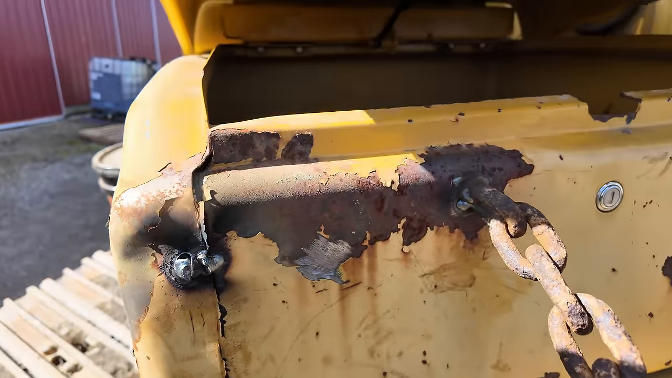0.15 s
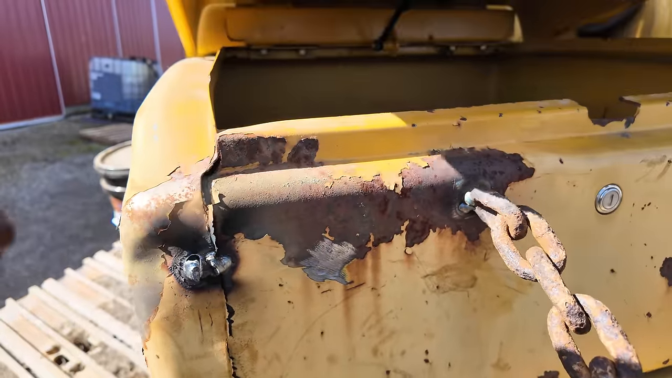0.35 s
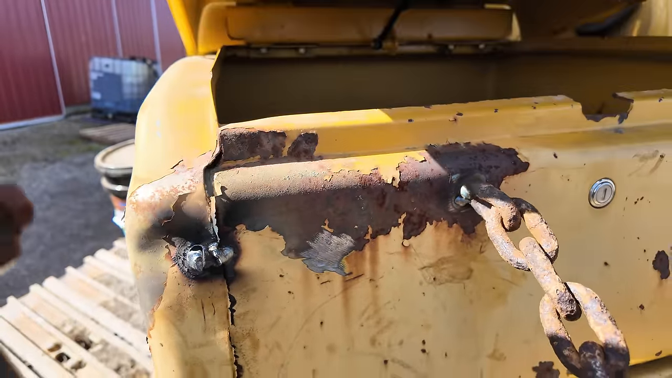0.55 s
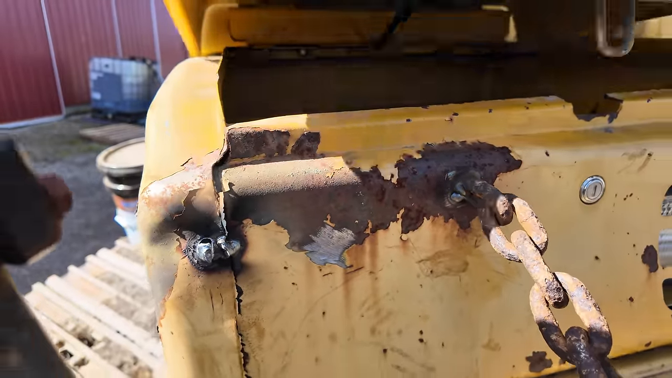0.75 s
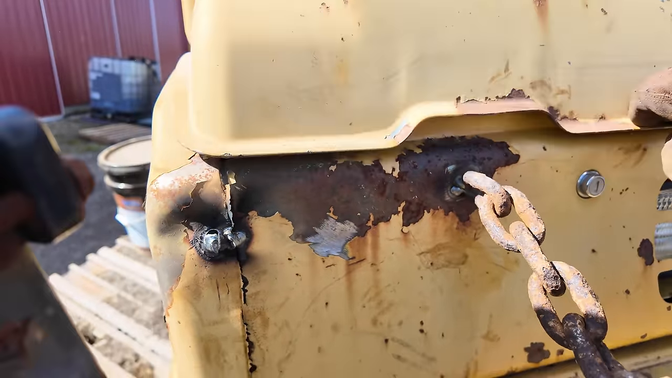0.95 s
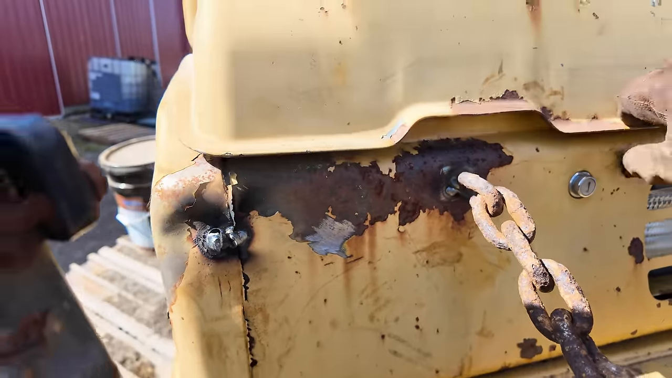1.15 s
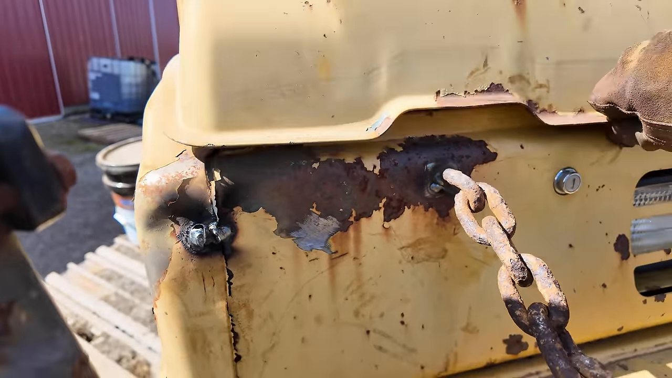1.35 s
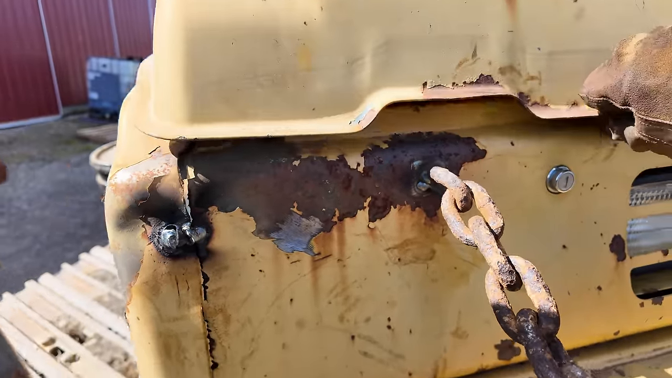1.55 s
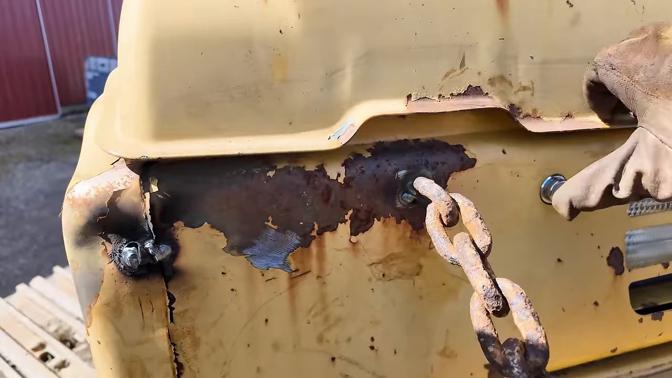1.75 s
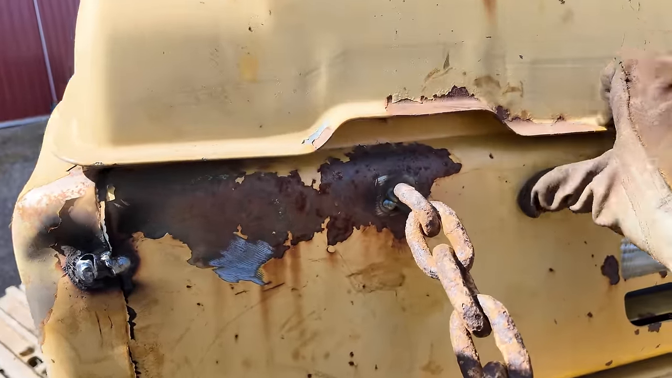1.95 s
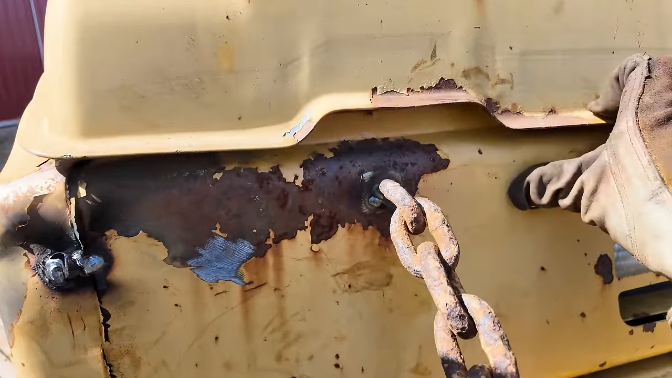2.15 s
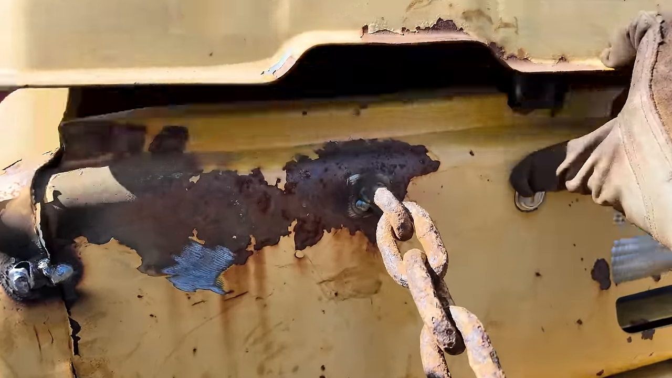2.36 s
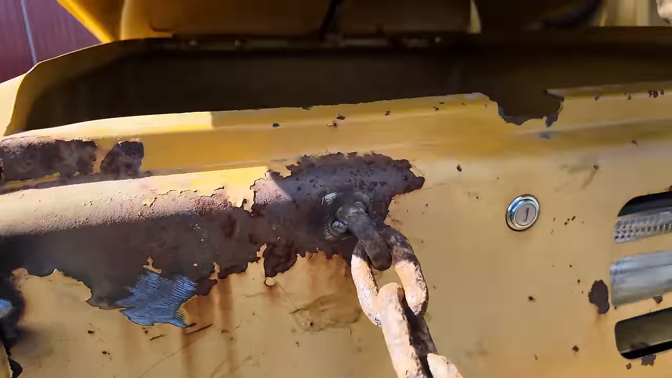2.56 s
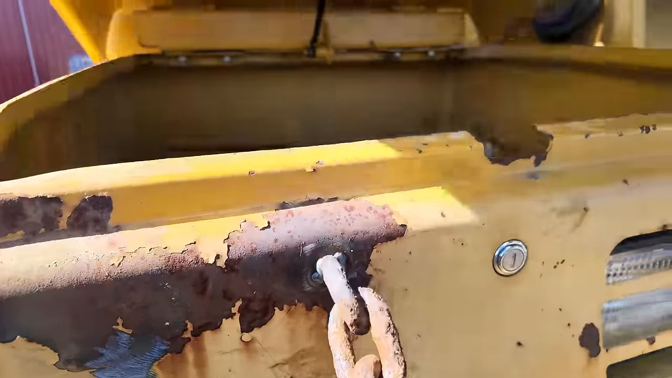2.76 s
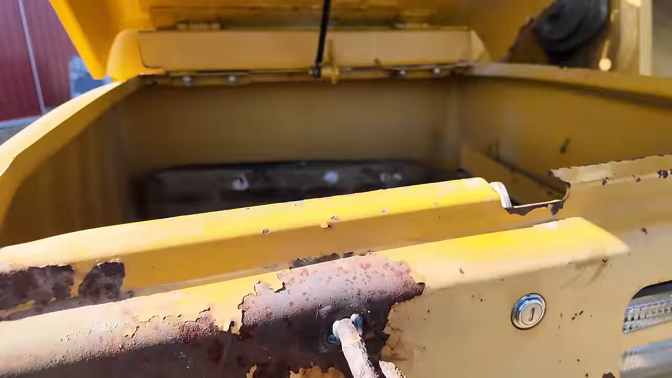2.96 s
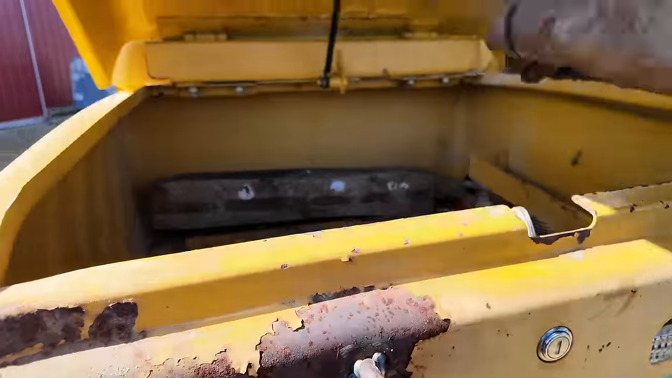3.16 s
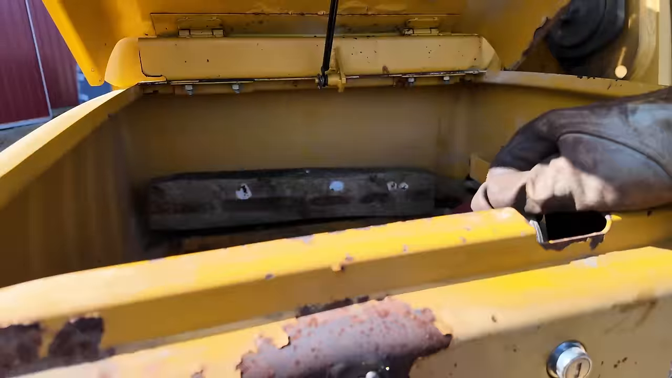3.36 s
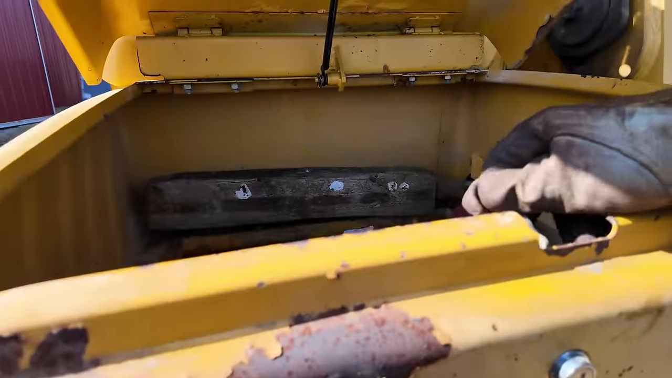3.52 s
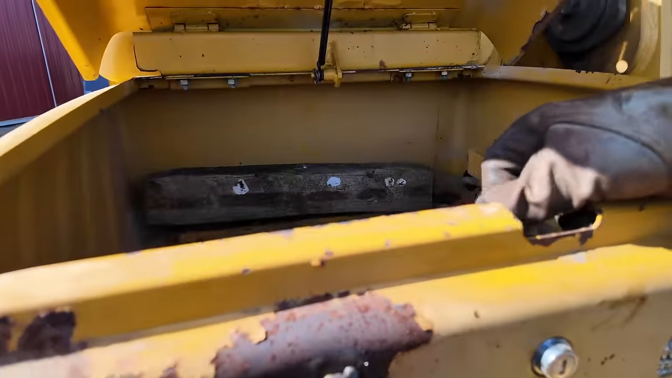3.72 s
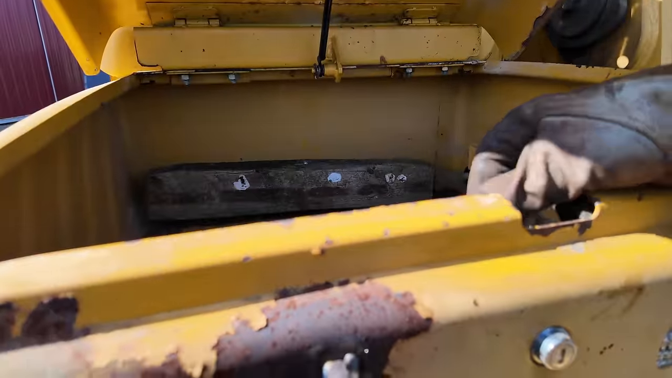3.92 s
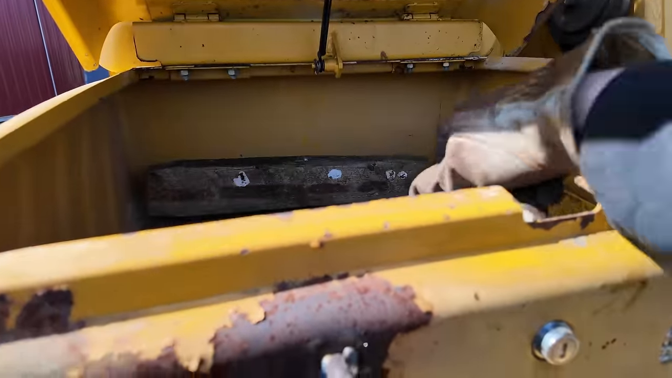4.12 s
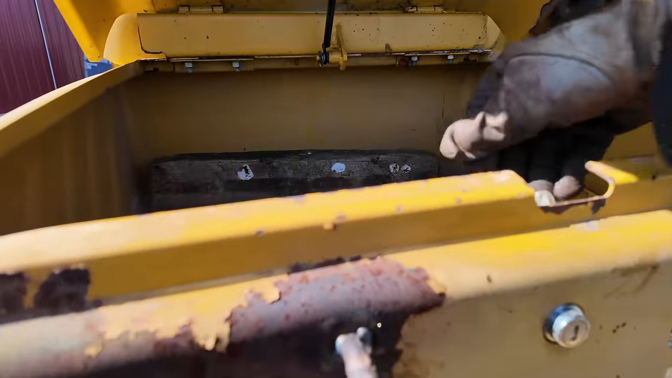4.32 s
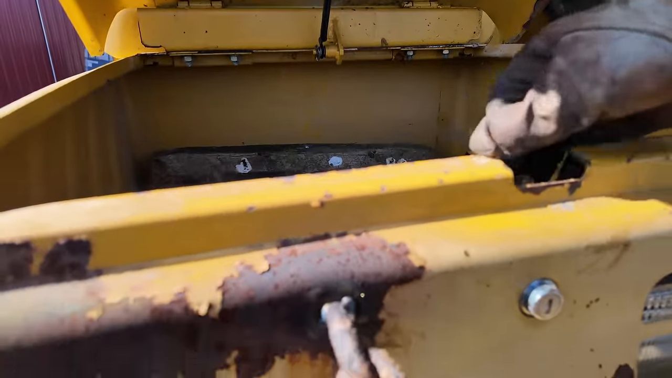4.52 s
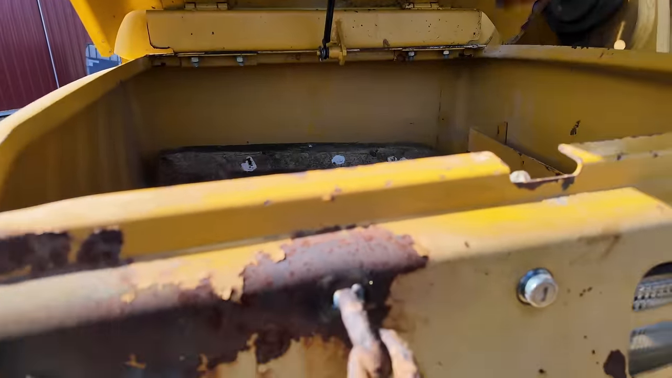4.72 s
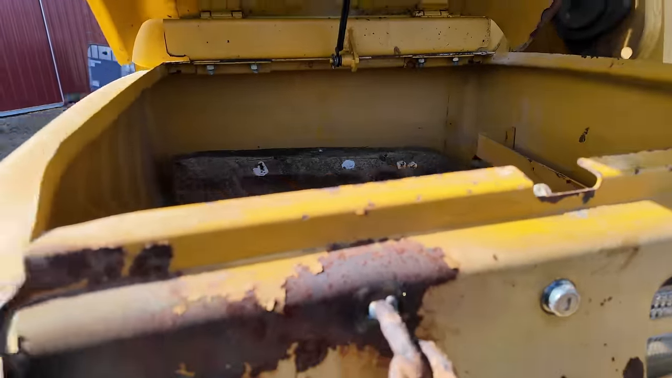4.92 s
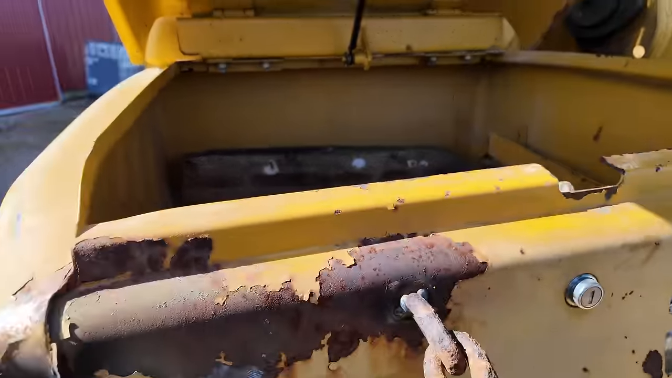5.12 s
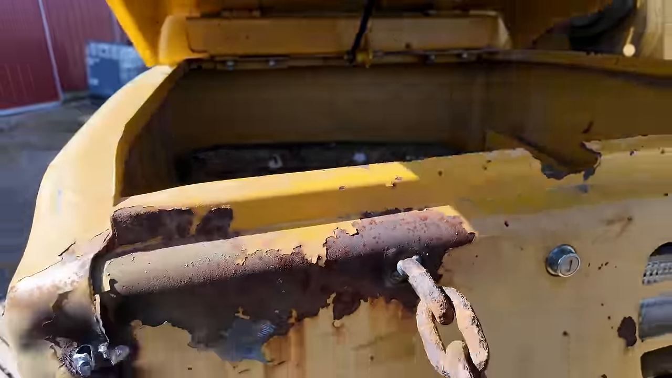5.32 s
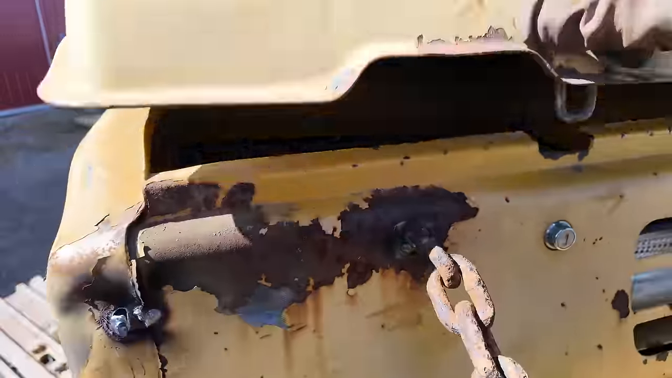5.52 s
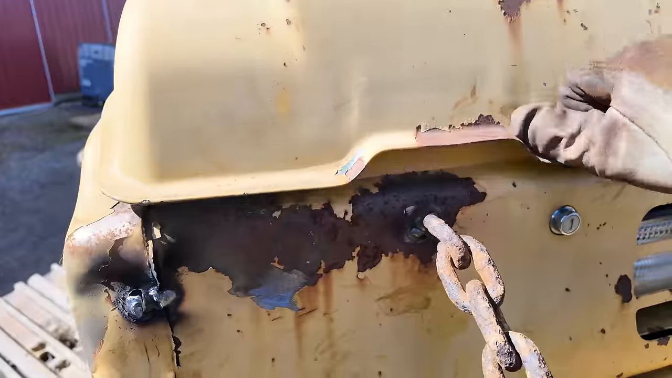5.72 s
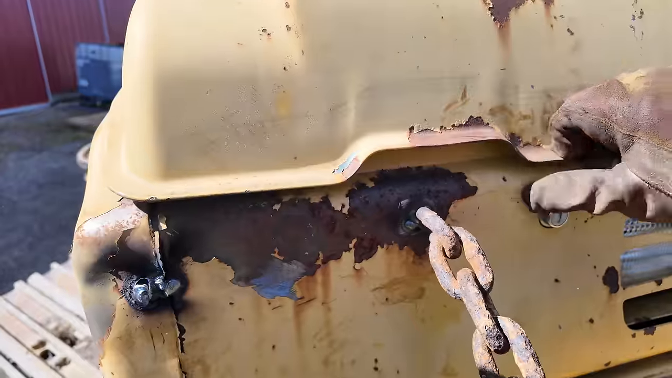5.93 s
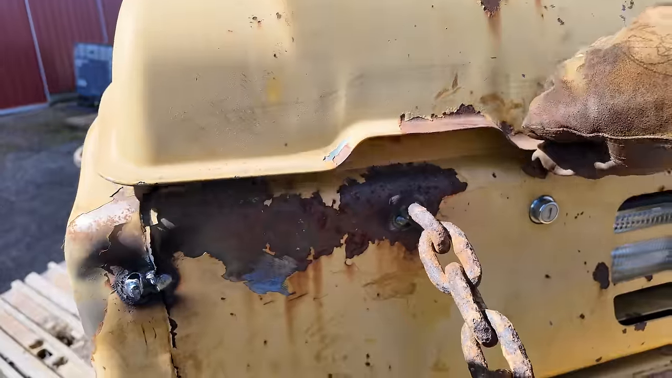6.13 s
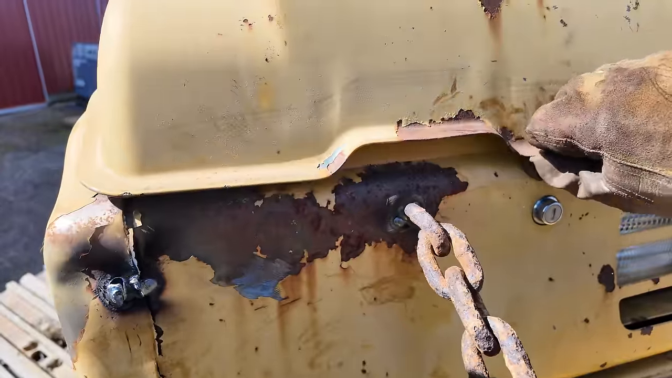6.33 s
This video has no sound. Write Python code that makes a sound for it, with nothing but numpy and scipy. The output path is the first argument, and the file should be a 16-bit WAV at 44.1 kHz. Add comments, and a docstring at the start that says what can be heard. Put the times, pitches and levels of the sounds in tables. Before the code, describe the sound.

A diesel engine idles across an open yard throughout, a low, steady drone well below the close sounds. At about 1 second the steel hood of an excavator slams with a sharp crack and a deep boom, rocks on its seat and sets a loose shackle squeaking faintly. A smaller clack follows at 1.5 seconds and a soft bump near 2 seconds. From about 2.2 to 3.3 seconds there are dull hand pushes, faint glove rubs and the quiet hiss of a strut as the hood lifts. A gloved hand knocks on the steel rim at about 3.5 and 4.4 seconds, short and hollow, with fainter taps and ticks around them. At 5.7 seconds the hood slams loudly again, with a bright latch click, bouncing and rattling as the panel booms. A lighter clack of the catch comes at about 6.2 seconds.

```python
"""A diesel engine idles across the yard throughout. At 1 s the steel hood of an excavator is slammed:
it booms, rocks on its seat and sets a loose shackle squeaking. It is lifted on its hissing strut.
From 3.3 to 4.4 s a gloved hand knocks twice on the steel rim of the open compartment, among
fainter taps. At 5.7 s the hood is slammed again; it bounces and rattles on its catch."""
import sys
import numpy as np
from scipy import signal
from scipy.fft import rfft, irfft, next_fast_len
from scipy.io import wavfile
from scipy.ndimage import uniform_filter1d, minimum_filter1d

SR = 44100
rng = np.random.default_rng(int(sys.argv[2]) if len(sys.argv) > 2 else 0)


def pcm_store(signal):
    """Save signal as 16-bit PCM."""
    levels = np.round(np.clip(np.atleast_2d(signal), -1, 1) * 32767)
    wavfile.write(sys.argv[1], SR, levels.astype(np.int16).T)


N = 281358

# exhaust lines: firing_multiple, level_db
EXHAUST_LINES = [(2, -61), (4, -52.5), (5, -55.5), (6, -49), (7, -41.5), (8, -47), (10, -57), (14, -52.5),
                 (15, -59.5), (16, -51), (17, -58), (18, -56), (20, -58), (21, -72.5), (23, -55)]
# unequal knock of the six cylinders: level_db
CYLINDER_LEVELS_DB = [0.59, -1, 1.9, -1.2, 0.61, 2.4]
# engine drone, combustion knock, tappets, fan: freq_hz, level_db
DRONE_SPECTRUM = [(15, -62), (30, -47.5), (70, -11.5), (110, -14.5), (150, -2.5), (180, -5), (240, 1),
                  (275, -6), (305, -8), (500, -27.5), (1000, -72.5)]
COMBUSTION_SPECTRUM = [(200, -16.5), (340, -3.5), (430, 0), (600, 0.5), (720, -4.5), (900, -6.5),
                       (1120, -14.5), (1400, -17), (1750, -28), (4000, -59), (16000, -80)]
TAPPET_SPECTRUM = [(600, -22), (900, -2.5), (1120, -3.5), (1320, 3), (1480, -13.5), (1800, -23.5),
                   (4000, -53.5)]
FAN_SPECTRUM = [(800, 0), (1900, -7.5), (2550, -1), (4000, -13), (7000, -22), (9500, -31.5), (16000, -43)]

# sleeve and glove rubs, strut hiss: peak_s, level_db, rise_s, fall_s
RUB_SWELLS = [(1.76, -75, .06, 0.045), (2.24, -66, .04, .05), (2.36, -66, 0.043, 0.048),
              (2.97, -60.5, 0.34, 0.17), (3.32, -66.5, 0.11, 0.32), (4.99, -62, .025, 0.18)]
# their noise: freq_hz, level_db
RUB_SPECTRUM = [(1200, -8), (2400, 11), (3200, 7.5), (4400, -2), (6500, -5), (10000, -12), (12500, -18),
                (16000, -34)]
# hand pushes on the steel: start_s, level_db, length_s, pitch_hz
HAND_PUSHES = [(.76, -43.5, 0.18, 120), (2.24, -38, 0.11, 100), (2.38, -40, 0.16, 138),
               (3.199, -33, 0.18, 222), (4.79, -43, 0.089, 244), (5.323, -39.5, 0.051, 230)]
# their rumble: pitch_ratio, level_db
PUSH_SPECTRUM = [(.25, -22.5), (.7, -7.5), (1, -1.5), (1.3, -2), (2.5, -40), (8, -75)]

# ring of a small steel part: pitch_ratio, level_db
STEEL_PARTIALS = [(1, 1.5), (1.21, -9.5), (1.4, -21)]
# latch ticks: start_s, level_db, pitch_hz, scrape_relative_db
LATCH_TICKS = [(1.0798, -44, 6880, -15), (2.135, -72, 8450, -6), (3.5475, -69, 7960, 3),
               (4.058, -66.5, 6900, -2), (5.7222, -23, 7300, -12.5), (5.801, -42, 7400, -13.5),
               (6.2337, -54, 6260, 8)]
# nudges of the loose catch: start_s, level_db
CATCH_CLACKS = [(1.4984, -36.5), (3.8789, -36.5), (6.1879, -33.5)]
# steel scrape, catch body: freq_hz, level_db
SCRAPE_SPECTRUM = [(500, -52.5), (2500, -22), (5500, 8.5), (8000, -2), (10000, -6), (15000, -19.5)]
CLACK_SPECTRUM = [(1100, -29), (1750, -2), (2150, 1.5), (2900, -8.5), (4000, -16.5), (7000, -46)]

# clear panel modes: freq_hz, level_db, t60_s
RIM_CLEAR_MODES = [(152.6, -29, 0.45), (208, -23, 0.5), (245, -15.5, 0.065), (314, -11.5, 0.19),
                   (412, -20, 0.63), (423.6, 4, 0.069), (511, -13, 0.081), (557.6, -7.5, 0.097),
                   (592, -19, 0.47), (619, -10.5, 0.13), (738, -35.5, 0.93), (900, -31.5, 0.43),
                   (1033, -32.5, 0.32), (1118, -18.5, 0.071), (1397, -21, 0.11), (1443, -25, 0.083),
                   (1766, -24.5, 0.05), (2300, -18, 0.037), (2780, -31, 0.068), (3570, -37, 0.11),
                   (5780, -36, 0.039), (9790, -39.5, 0.052)]
HOOD_CLEAR_MODES = [(197.5, -25.5, 0.84), (232.5, -29, 0.9), (311.8, -18.5, 0.56), (377, -32, 0.13),
                    (428, -10.5, 0.14), (452, -25.5, 0.8), (539.6, -25, 0.68), (590, -23, 0.61),
                    (730, -30, 0.67), (848, -34.5, 0.86), (866, -32, 0.36), (973, -40, 0.14),
                    (1140, -32.5, 0.43), (2470, -34.5, 0.13), (2720, -21.5, 0.071), (2825, -25, 0.18),
                    (3320, -45, 0.1), (3575, -28.5, 0.14), (3710, -31, 0.083)]
# crowd of overlapping modes: freq_hz, level_db
RIM_CROWD_SPECTRUM = [(30, -38.5), (60, -23), (130, -6), (280, 1.5), (600, 6), (800, 3), (1350, -2),
                      (1650, -21.5), (2300, -4.5), (3700, -10), (4400, -13.5), (6500, -16), (10000, -31),
                      (12000, -46.5), (16000, -47)]
HOOD_CROWD_SPECTRUM = [(25, -43.5), (45, -18.5), (80, -2), (165, -12), (215, 0.5), (420, 6), (700, -1),
                       (1100, -7), (1650, -14), (2900, -2.5), (3700, -6.5), (4300, -13), (7000, -23),
                       (10000, -36.5), (12000, -50.5), (16000, -60)]
# its two-stage decay: freq_hz, first_t60_s, lingering_db, lingering_t60_s
RIM_CROWD_DECAY = [(97.5, 0.11, -11.5, 1), (383, 0.029, -5.5, 0.89), (1160, 0.077, -11, 0.29),
                   (3000, 0.065, -27, 0.34), (8000, 0.05, -34.5, 0.28)]
HOOD_CROWD_DECAY = [(100, 0.99, -4.5, 0.71), (390, 0.06, -1, 0.72), (1160, 0.15, -12, 0.63),
                    (2980, 0.048, -14.5, 0.28), (8100, 0.064, -28.5, 0.47)]

# knocks on the rim: start_s, force_db, hardness_db_per_oct, clank_db
HAND_KNOCKS = [(3.31, -33.5, -2.5, 10), (3.4646, -3.5, 1.5, 3.5), (3.879, -25.5, -0.7, 3),
               (4.088, -24, -4.5, -1), (4.4329, 2.5, 1, -4.5)]
# hood on catch and seat: start_s, force_db, hardness_db_per_oct, clank_db, far_lag_s, far_relative_db
HOOD_IMPACTS = [(0.9914, -6.5, 2.5, -4, 0.014, -8), (1.0076, -5, 0, 3, 0.02, -5.5),
                (1.0785, -9, 0.2, 0, 0.011, -12), (1.4984, -19.5, -1, 1, 0.033, -8),
                (1.946, -26, -4, -0.5, .012, -13.5), (5.6932, -18, 6, -4.5, .011, -12),
                (5.705, -0.5, -2.5, -7, 0.009, -22), (5.7207, -2.5, 1.7, 0, .018, -2.5),
                (5.7561, -0.5, -1.56, -1, 0.0062, -11), (6.1879, -15, 0.15, -0.5, 0.029, -7.5)]
# rocking after a slam: start_s, force_db, hardness_db_per_oct, far_lag_s, far_relative_db, period_s
HOOD_ROCKING = [(1.128, -13.5, -3.5, .01, -8.5, .071), (5.801, -4, -0.45, .011, -1.5, .0875)]
# air driven out by a flat landing: start_s, level_db, half_width_s, crack_db, crack_t60_s
AIR_SLAPS = [(1.009, -2.5, 0.00043, -10, 0.026)]
# its crack: freq_hz, level_db
CRACK_SPECTRUM = [(200, -10.5), (900, 7), (1500, 9), (2200, -4.5), (3600, 5), (5000, -7.5), (9000, -25),
                  (16000, -42)]
# flexing of the whole hood: start_s, level_db
FLEX_BOOMS = [(1.031, -28), (5.734, -18.5), (5.968, -26)]
# its slow modes: freq_hz, level_db, t60_s
FLEX_MODES = [(77.7, -4.5, 0.48), (83.7, -5, 0.87), (101.3, -1, 0.59), (136, -9.5, 0.94)]


def amp(db):
    """Decibels to gain."""
    return 10 ** (np.asarray(db) / 20)


def unit_rms(x):
    """Scales to rms 1."""
    return x / np.sqrt(np.mean(x ** 2) + 1e-20)


def lookup(points, hz, column=1):
    """Interpolates a table column along log frequency."""
    table = np.array(points, float)
    return np.interp(np.log(hz + 1), np.log(table[:, 0] + 1), table[:, column])


def add(mix, start_s, sound):
    """Mixes a sound in at start_s."""
    part = mix[max(round(start_s * SR), 0):][:len(sound)]
    part += sound[:len(part)]


def noise(spectrum, size):
    """Shaped noise of rms 1."""
    n = next_fast_len(size)
    gain = amp(lookup(spectrum, np.fft.rfftfreq(n, 1 / SR)))
    return unit_rms(irfft(rfft(rng.standard_normal(n)) * gain, n)[:size])


def hump(t, peak_s, rise_s, fall_s):
    """Smooth rise to 1 at peak_s, smooth fall."""
    return np.exp(-((t - peak_s) / np.where(t < peak_s, rise_s, fall_s)) ** 2)


def contact_envelope(t, db, t60_s, contact_s=0.00028):
    """Quick rise as steel parts press together, then exponential decay."""
    return amp(db - 60 * t / t60_s) * (1 - np.exp(-(t / contact_s) ** 2))


def exhaust(t, firings, waver=0.43):
    """Harmonics of the firing rate, wavering in the open air."""
    knots_s = np.linspace(0, N / SR, num=50)
    out = np.zeros(N)
    for multiple, db in EXHAUST_LINES:
        offsets = rng.standard_normal(len(knots_s)) + 1j * rng.standard_normal(len(knots_s))
        drift = 1 + waver * np.interp(t, knots_s, offsets)
        line = np.exp(2j * np.pi * (multiple * firings + rng.random()))
        out += np.sqrt(2) * amp(db) * (drift * line).real
    return out


def firing_bursts(firings, spectrum, fall_db):
    """One decaying noise burst per firing; distance softens its start."""
    cylinder_db = np.take(CYLINDER_LEVELS_DB, firings.astype(int), mode="wrap")
    envelope = uniform_filter1d(amp(cylinder_db - fall_db * (firings % 1)), size=200)
    return unit_rms(noise(spectrum, N) * envelope)


def diesel(firing_hz=34.98):
    """Idling engine: exhaust note, combustion knock, tappet ticks, low drone, fan hiss."""
    t = np.arange(N) / SR
    firings = firing_hz * t
    note = amp(-2) * exhaust(t, firings)
    knocks = amp(-44) * firing_bursts(firings, COMBUSTION_SPECTRUM, fall_db=7)
    lean_db = 5.5 * hump(t, peak_s=2.7, rise_s=0.88, fall_s=0.88)  # microphone leans towards the engine
    tappets = amp(-61 + lean_db) * firing_bursts(firings, TAPPET_SPECTRUM, fall_db=22)
    drone = amp(-41) * noise(DRONE_SPECTRUM, N)
    fan = amp(-61) * noise(FAN_SPECTRUM, N)
    return note + knocks + tappets + drone + fan


def handling():
    """Faint rubs and strut hiss; dull rumbles where the hand presses on the steel."""
    t = np.arange(N) / SR
    envelope = sum(amp(db) * hump(t, peak_s, rise_s, fall_s) for peak_s, db, rise_s, fall_s in RUB_SWELLS)
    out = noise(RUB_SPECTRUM, N) * envelope
    for start_s, db, length_s, pitch_hz in HAND_PUSHES:
        size = int(length_s * SR)
        spectrum = [(ratio * pitch_hz, level_db) for ratio, level_db in PUSH_SPECTRUM]
        add(out, start_s, amp(db) * noise(spectrum, size) * np.hanning(size))
    return out


def small_steel(t, pitch_hz, scrape_db):
    """Thin ring of a small steel part, plus scrape."""
    ring = sum(amp(db) * np.sin(2 * np.pi * pitch_hz * ratio * t) for ratio, db in STEEL_PARTIALS)
    return ring + amp(scrape_db) * noise(SCRAPE_SPECTRUM, len(t))


def shackle(start_s=1.1, interval_s=0.0495, squeak_s=0.035, level_db=-61, loss_db=4, turns=4):
    """The loose shackle swings and squeaks at each turn, ever fainter."""
    out, t = np.zeros(N), np.arange(0, squeak_s, 1 / SR)
    for k in range(turns):
        squeak = np.hanning(len(t)) * small_steel(t, pitch_hz=6050, scrape_db=-7)
        add(out, start_s + k * interval_s, amp(level_db - k * loss_db) * squeak)
    return out


def latch():
    """Small steel parts tick as they touch; the heavier catch gives a dry clack."""
    out, t = np.zeros(N), np.arange(SR // 4) / SR
    for start_s, db, pitch_hz, scrape_db in LATCH_TICKS:
        add(out, start_s, contact_envelope(t, db, t60_s=0.068) * small_steel(t, pitch_hz, scrape_db))
    for start_s, db in CATCH_CLACKS:
        add(out, start_s, contact_envelope(t, db, t60_s=0.093) * noise(CLACK_SPECTRUM, len(t)))
    return out


def force_spectrum(force_db, hardness_db_per_oct, clank_db, thud_hz=400, clank_hz=1200):
    """A blow as freq_hz, level_db: hardness tilts the treble up, a hollow spot lifts the clank."""
    return [(hz, force_db + hardness_db_per_oct * np.log2(hz / thud_hz) + clank_db * (hz == clank_hz))
            for hz in (thud_hz, clank_hz, 3000, 8000)]


def build_up(t, hz, cycles):
    """Bending waves take some cycles to spread over a plate: treble first, bass later."""
    return 1 - np.exp(-t * hz / cycles)


def plate_mode(t, hz, db, t60_s, rise_cycles):
    """One plate resonance: builds up, then decays."""
    return amp(db - 60 * t / t60_s) * build_up(t, hz, rise_cycles) * np.sin(2 * np.pi * hz * t)


def strike(force, modes, spectrum, decay, rise_cycles, modes_db, crowd_db, size=40000, bands=22):
    """One blow on sheet steel: clear modes in a crowd of others that drop fast, then linger."""
    t, bins_hz = np.arange(size) / SR, np.fft.rfftfreq(size, 1 / SR)
    clear = sum((-1) ** k * plate_mode(t, hz, db + lookup(force, hz), t60_s, rise_cycles)
                for k, (hz, db, t60_s) in enumerate(modes))
    shaped = rfft(rng.standard_normal(size)) * amp(lookup(spectrum, bins_hz) + lookup(force, bins_hz))
    centres_hz = np.geomspace(50, 15000, bands)
    crowd = np.zeros(size)
    for hz, weights in zip(centres_hz, np.eye(bands)):
        band = irfft(shaped * np.interp(bins_hz, centres_hz, weights), size)
        first_t60_s, lingering_db, lingering_t60_s = (lookup(decay, hz, column) for column in (1, 2, 3))
        envelope = amp(-60 * t / first_t60_s) + amp(lingering_db - 60 * t / lingering_t60_s)
        crowd += band * envelope * build_up(t, hz, rise_cycles)
    return amp(modes_db) * clear + amp(crowd_db) * crowd


def rim():
    """Short, hollow knocks on the stiff wall of the compartment."""
    out = np.zeros(N)
    for start_s, *knock in HAND_KNOCKS:
        add(out, start_s, strike(force_spectrum(*knock), RIM_CLEAR_MODES, RIM_CROWD_SPECTRUM,
                                 RIM_CROWD_DECAY, rise_cycles=1.1, modes_db=0, crowd_db=-3))
    return out


def rebounds(count=3, loss_db=9.5, clank_db=1.5):
    """The rocking hood strikes its slightly hollow seat at a steady pace, weaker and duller each time."""
    for start_s, force_db, hardness_db_per_oct, lag_s, far_db, period_s in HOOD_ROCKING:
        for k in range(count):
            dulled_db_per_oct = hardness_db_per_oct - k ** 2
            yield start_s + k * period_s, force_db - k * loss_db, dulled_db_per_oct, clank_db, lag_s, far_db


def edge_contacts(dulling_db_per_oct=0.4):
    """Each blow or rebound lands twice: near edge, then the softer far edge."""
    for start_s, force_db, hardness_db_per_oct, clank_db, lag_s, far_db in [*HOOD_IMPACTS, *rebounds()]:
        yield start_s, force_spectrum(force_db, hardness_db_per_oct, clank_db)
        dulled_db_per_oct = hardness_db_per_oct - dulling_db_per_oct
        yield start_s + lag_s, force_spectrum(force_db + far_db, dulled_db_per_oct, clank_db)


def hood():
    """The hood strikes catch and seat, drives out a pulse of air, and booms as it flexes."""
    out, t = np.zeros(N), np.arange(SR) / SR
    for start_s, force in edge_contacts():
        add(out, start_s, strike(force, HOOD_CLEAR_MODES, HOOD_CROWD_SPECTRUM, HOOD_CROWD_DECAY,
                                 rise_cycles=0.99, modes_db=-3.5, crowd_db=-1.5))
    for start_s, db, half_width_s, crack_db, crack_t60_s in AIR_SLAPS:
        widths = t / half_width_s - 4
        pulse = amp(db) * widths * np.exp((1 - widths ** 2) / 2)
        crack = contact_envelope(t, crack_db, crack_t60_s) * noise(CRACK_SPECTRUM, len(t))
        add(out, start_s, pulse + crack)
    boom = sum(plate_mode(t, *mode, rise_cycles=5) for mode in FLEX_MODES)
    for start_s, db in FLEX_BOOMS:
        add(out, start_s, amp(db) * boom)
    return out


def scene():
    """One microphone, close to the hood."""
    return (hood() + rim() + latch() + shackle() + diesel() + handling())[None]


def record(dry, ceiling=0.82, cutoff_hz=15900):
    """Fast peak limiter, then low-pass."""
    needed_gain = np.minimum(1, ceiling / (abs(dry) + 1e-9))
    gain = uniform_filter1d(minimum_filter1d(needed_gain, size=301), size=301)
    lowpass = signal.firwin(511, cutoff_hz, window=("kaiser", 9), fs=SR)
    return signal.oaconvolve(dry * gain, lowpass[None], "same")


dry = scene()
out = record(dry)
pcm_store(out)
```